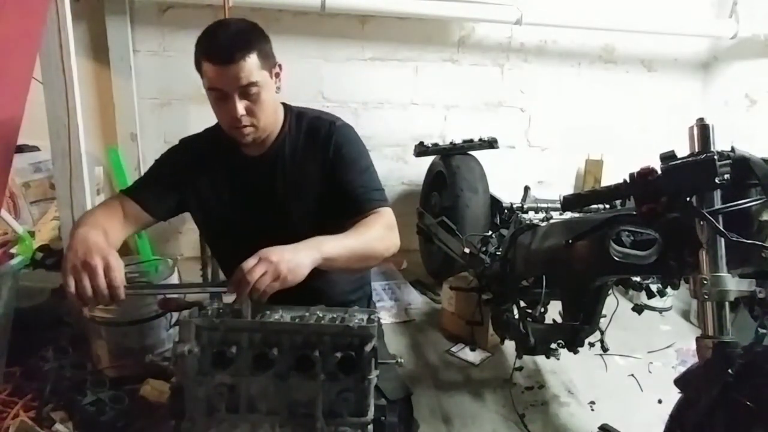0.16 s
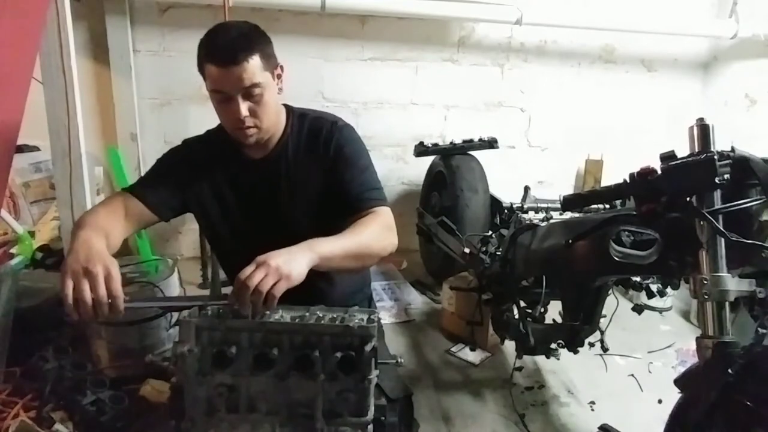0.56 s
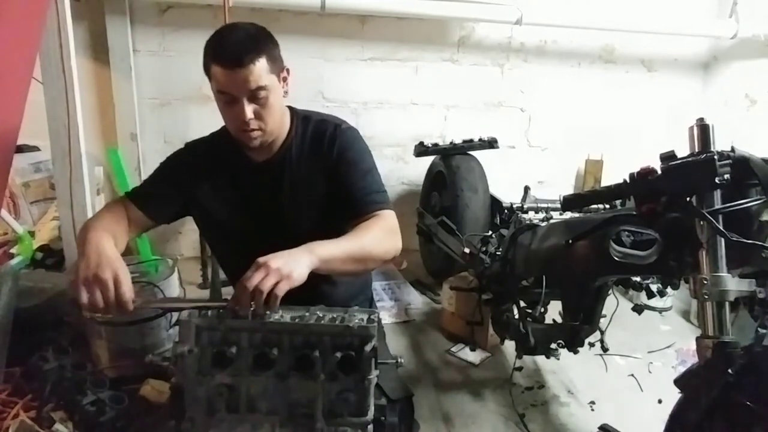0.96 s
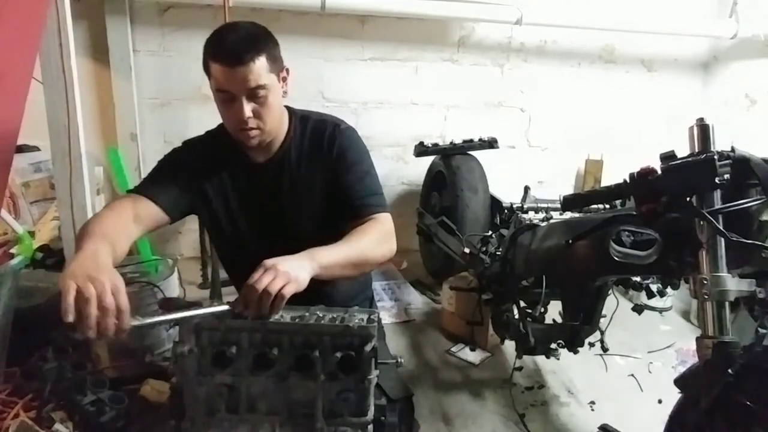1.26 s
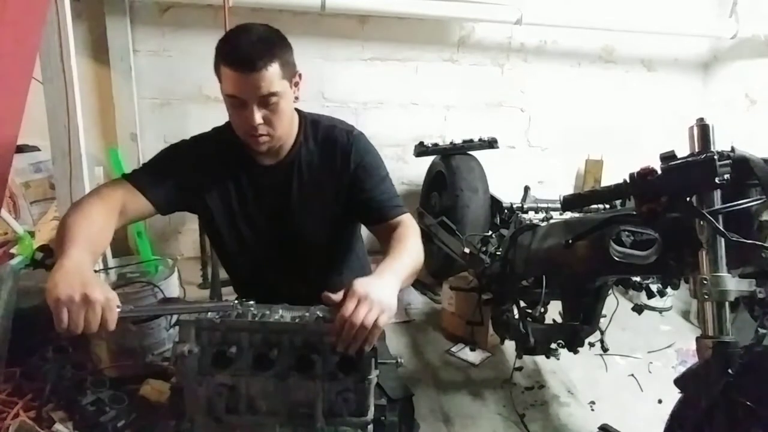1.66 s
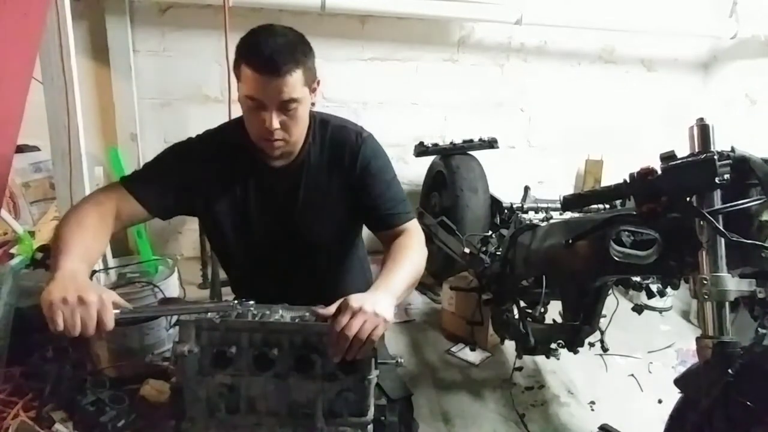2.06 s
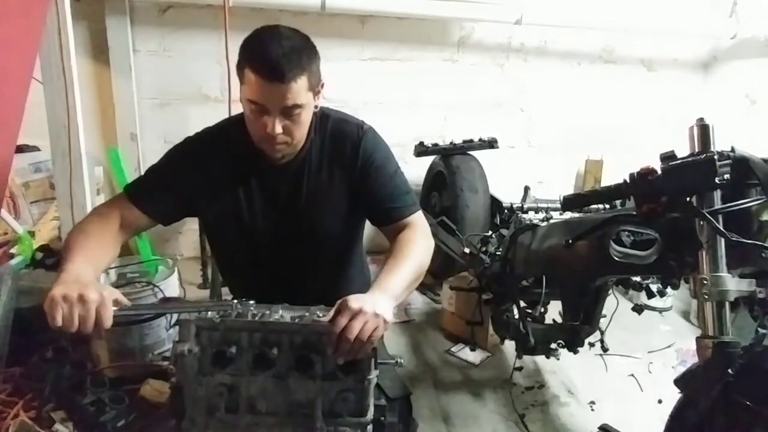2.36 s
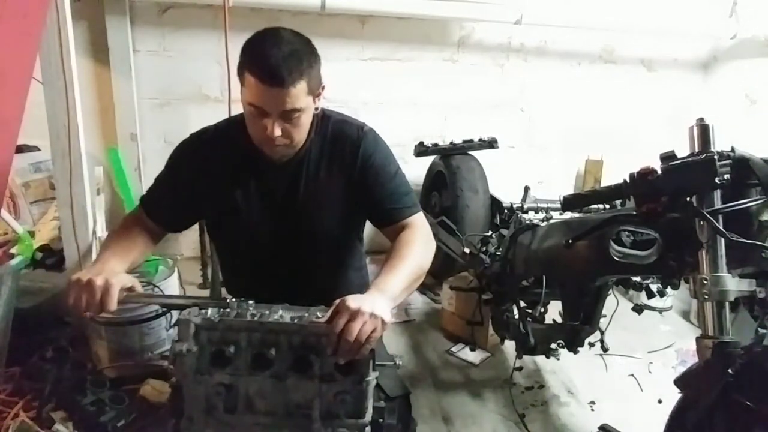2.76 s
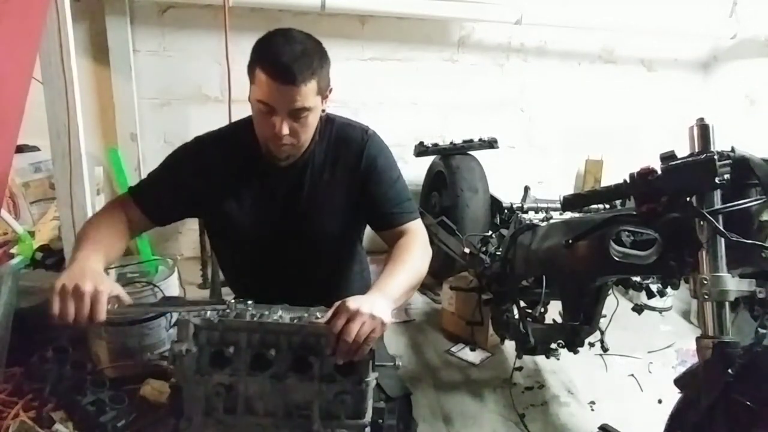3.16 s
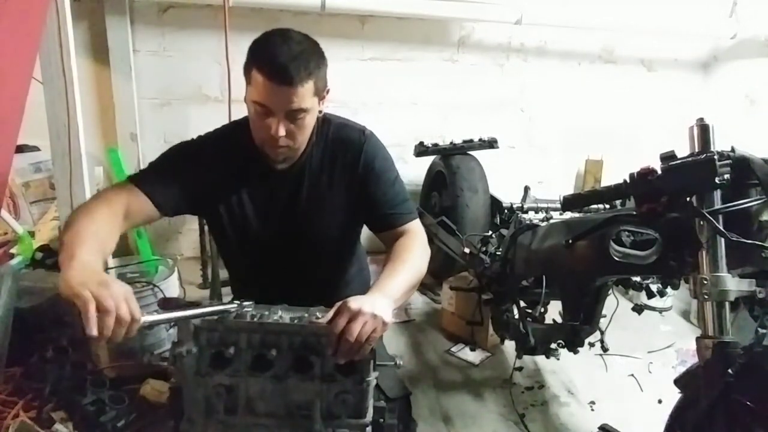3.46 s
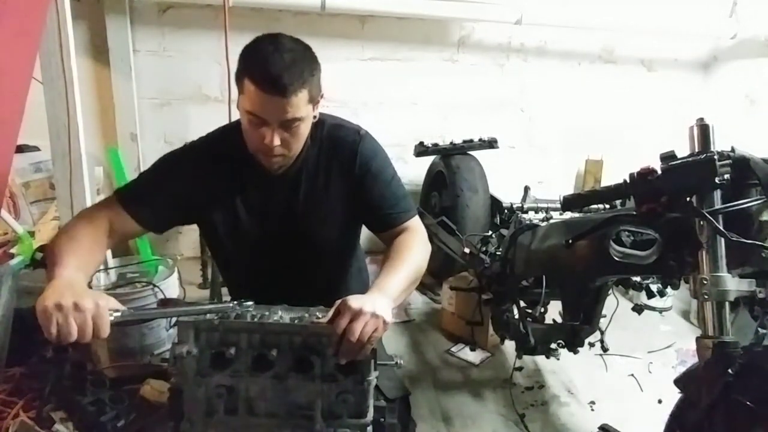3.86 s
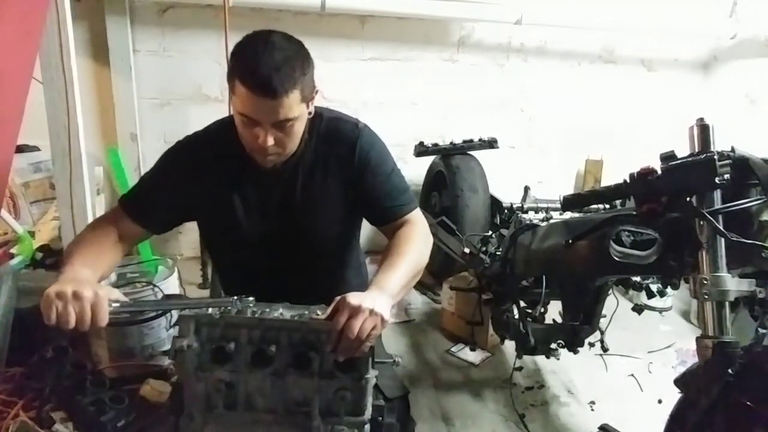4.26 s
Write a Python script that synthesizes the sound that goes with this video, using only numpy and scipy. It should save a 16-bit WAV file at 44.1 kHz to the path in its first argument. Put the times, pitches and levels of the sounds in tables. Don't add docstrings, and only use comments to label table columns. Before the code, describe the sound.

A click-type torque wrench works on an engine block in a small brick garage. A short steel knock comes first, then one hard, bright crack that rings briefly. Five quick ratchet ticks follow, then a quiet gap, then four more ticks. Faint hand and sleeve rustles fall between, over steady low rumble and mains hum, heard by one small microphone with a bright, slightly boxy tone.

```python
import sys
import numpy as np
from scipy import signal
from scipy.fft import rfft, irfft
from scipy.io import wavfile
from scipy.ndimage import uniform_filter1d

SR = 44100
rng = np.random.default_rng(int(sys.argv[2]) if len(sys.argv) > 2 else 0)


def undo_db(level):
    steps = np.asarray(level, float) / 20
    return 10 ** steps


def transcribe(u):
    v = np.clip(np.atleast_2d(u).T, -1, 1)
    q = np.round(v * 32767).astype(np.int16)
    wavfile.write(sys.argv[1], SR, q)


N = 193599

# start_s, energy_db
BREAK_EVENTS = [(.8207, 18.5)]
# freq_hz, density_db_per_hz
BREAK_COLOUR = [(500, -30), (1000, -18.5), (1400, -17), (2000, -18.5), (2600, -8.5), (2950, -11.5),
                (3500, -11.5), (4150, -13), (4700, -6), (5600, -14), (7100, -9.5), (8700, -10.5),
                (10000, -16), (14500, -20.5)]
# freq_hz, level_db, t60_s
TUBE_MODES = [(2600, -1, 0.087), (2710, 9, 0.13), (3070, -16, .2), (3580, -5, .09), (4590, -17, .2),
              (4980, -21, .2), (5830, -22, .2), (6700, 1, .14), (6440, -8, .2), (6660, -4, .14),
              (7040, -3, .25), (7330, 10, 0.16), (7700, -1, 0.081), (7200, -8, .15), (8550, -12, .25),
              (8060, -3, .2), (8963, -29, .2), (9356, -26, .2), (12540, -28, .18)]
# start_s, energy_db
SLACK_EVENTS = [(0.5148, 0.5)]
# freq_hz, density_db_per_hz
SLACK_COLOUR = [(1000, -28), (2000, -10), (3200, -9), (3800, 0), (4700, 3.5), (5400, 1.5), (7200, -13.5),
                (9000, -16), (12000, -24), (17000, -26)]
# freq_hz, level_db, t60_s
SOCKET_MODES = [(3900, -12, .03), (4590, 7, .02), (5200, -7, .05), (5930, -16, .04), (7100, -12, 0.028),
                (8100, -9, .03)]
# start_s, energy_db, seating_0_to_1 (glancing to firm), edge_db (above 12 kHz)
TICKS = [
    (1.1793, -2.5, 0.8, 4),
    (1.2214, -1, 0.7, 2),
    (1.2641, -1.5, .95, 2),
    (1.3071, 0.5, 0, 7),
    (1.358, -4.5, 0.77, 3),
    (3.3223, -1, 0.1, 1),
    (3.3674, -1, 0.57, 3),
    (3.4144, -1, 0.83, 8),
    (3.4715, -2, 0.8, 9),
]
# freq_hz, density_db_per_hz
TICK_COLOURS = [
    [(1600, -34), (2600, -18.5), (3200, -19), (3520, -8.5), (3900, -30), (5500, -4), (7000, -7.5), (8700, -16), (9400, -10), (10800, -10), (11600, -19), (12400, -4), (13800, -13), (15300, -13.5)],
    [(1700, -21), (2200, -22), (3150, -20), (3700, -24), (4300, -16.5), (4900, -16), (5600, -3.5), (7000, -10.5), (8700, -15), (9400, -7), (10900, -9.5), (11700, -16), (12700, -5.5), (13900, -18)],
]
# freq_hz, level_db, t60_s
PAWL_MODES = [(3210, -13, 0.047), (3560, -12, 0.032), (5450, -7, 0.03), (5870, -5, 0.025),
              (6650, -7, 0.067), (6930, -3, 0.044), (7180, 4, 0.027), (7690, 3.5, 0.03), (8330, 7, 0.019),
              (9500, 11, 0.013), (10100, -4, .014), (11000, -7, 0.036), (12200, -7, .009),
              (12900, -4, .011), (14420, -12, .03), (15200, -56, .03)]
# start_s, peak_db, centre_hz, width_hz, decay_ms
TOUCHES = [(.335, -51, 9000, 6000, 4), (0.39, -42.5, 9200, 5000, 2), (0.81, -35, 5800, 7000, 5.5),
           (1.127, -53, 13500, 3000, 4), (1.166, -41, 8800, 6000, 6), (1.602, -41.5, 7700, 9000, 4.1),
           (1.69, -49, 7950, 4000, 3.6), (3.31, -43, 8000, 2500, 5), (3.655, -39, 2840, 1500, 4.3),
           (3.685, -41, 4270, 1800, 12), (3.69, -50, 11000, 7000, 12), (3.842, -55, 8000, 4000, 4)]
# peak_s, peak_db, swell_db_per_s, fade_db_per_s
SWEEPS = [
    (.1, -60.5, 30, -2),
    (2.05, -55, 22, 45),
    (3.7, -55, 110, 80),
]
# freq_hz, density_db_per_hz
CLOTH_COLOUR = [(1500, -27), (6500, -3.5), (9000, -16), (16000, -18)]
# freq_hz, t60_s
ROOM_DECAY = [(1000, 0.27), (2600, 0.35), (6000, 0.32), (12500, 0.2), (16000, 0.15)]
# freq_hz, density_db_per_hz
AIR_COLOUR = [(25, -46), (44, -12), (60, -7.5), (103, -2), (190, -6.5), (300, -9), (800, -17),
              (1100, -18.5), (1900, -26), (3000, -30), (5000, -33.5), (8500, -42.5), (11000, -43.5),
              (17000, -47)]
# freq_hz, width_hz, level_db
BOOM_MODES = [(59.2, 13.2, 12), (93.7, 45, 5.5), (160, 7.9, 0), (242, 41, 4), (265.6, 4, 9), (292, 13, -7),
              (354.6, 26, 5), (407, 10, 4.5), (425, 21, 4), (526, 7.6, -5), (524.5, 9, 10), (570, 5.9, -3),
              (598, 48, 3.5), (637.6, 16.3, 11), (694, 12, 5.5), (920, 28, 4.5), (1030.4, 32, 8),
              (1090, 79, 4.5)]
# freq_hz, level_db_rms
HUM = [(119.4, -46)]

TRAVEL_S = .0006
SECOND_SWING_S = 3
FIRM_BODY_DB, FIRM_SHEEN_DB = 9, 9
PAWL_BOUNCE_MS = 2.2
AIR_DB = -33.5
MIC_HZ, MIC_WIDTH_HZ, MIC_DB = 7165, 2040, 11
STEADY_EDGE_HZ, ATTACK_EDGE_HZ = 15530, 16700


def evened(x):
    return x / np.sqrt(np.mean(x ** 2) + 1e-20)


def read(points, hz):
    f, value = np.transpose(points)
    return np.interp(np.log(hz + 1), np.log(f + 1), value)


def add(mix, start_s, sound):
    part = mix[round((start_s + TRAVEL_S) * SR):][:len(sound)]
    part += sound[:len(part)]


def coloured(x, gain_db):
    hz = abs(np.fft.fftfreq(4096, 1 / SR))
    log_gain = np.maximum(gain_db(hz), -100) * np.log(10) / 20
    taps = np.fft.ifft(np.exp(np.conj(signal.hilbert(log_gain)))).real[:2048]
    return signal.fftconvolve(x, taps)[:len(x)]


def break_over():
    out = np.zeros(N)
    for start_s, energy_db in BREAK_EVENTS:
        crack = blow(lambda hz: read(BREAK_COLOUR, hz), TUBE_MODES, crack_ms=1.3, ring_db=-6.0, spread_db=2,
                     bounce_ms=11.0, bounce_db=-4, wet_db=5.5, linger=0.98, carried_db=-15.5)
        add(out, start_s, undo_db(energy_db) * crack)
    return out


def ratchet():
    out = np.zeros(N)
    for start_s, energy_db, seating, edge_db in TICKS:
        colour = TICK_COLOURS[int(start_s > SECOND_SWING_S)]
        tick = blow(lambda hz: read(colour, hz), PAWL_MODES, crack_ms=1.9, ring_db=-4.5, spread_db=3.5,
                    bounce_ms=PAWL_BOUNCE_MS, bounce_db=-7, wet_db=-1.0, linger=0.98, carried_db=-7.5)
        body_db = FIRM_BODY_DB * seating
        sheen_db = FIRM_SHEEN_DB * seating ** 2
        landing = [(4500, body_db), (5200, 0), (8500, 0), (9000, sheen_db), (11300, sheen_db), (11800, edge_db)]
        add(out, start_s, undo_db(energy_db) * coloured(tick, lambda hz: read(landing, hz)))
    return out


def slack():
    out = np.zeros(N)
    for start_s, energy_db in SLACK_EVENTS:
        knock = blow(lambda hz: read(SLACK_COLOUR, hz), SOCKET_MODES, crack_ms=.8, ring_db=2.0, spread_db=0.0,
                     bounce_ms=3.4, bounce_db=-13, wet_db=1, linger=0.89, carried_db=-13)
        add(out, start_s, undo_db(energy_db) * knock)
    return out


def blow(colour_db, modes, crack_ms, ring_db, spread_db, bounce_ms, bounce_db, wet_db, linger, carried_db):
    t = np.arange(SR // 2) / SR
    chatter = rng.standard_normal(len(t)) * np.exp(-1000 * t / crack_ms)
    chance_db = 10 * np.log10(uniform_filter1d(abs(rfft(chatter, 4096)) ** 2, 50))
    chance_hz = np.fft.rfftfreq(4096, 1 / SR)
    crack = coloured(chatter, lambda hz: colour_db(hz) - np.interp(hz, chance_hz, chance_db))

    mode_hz, mode_db, t60_s = np.transpose(modes)[:, :, None]
    luck = rng.standard_normal((len(modes), 2))
    level = undo_db(mode_db + spread_db * luck[:, :1] - 60 * t / t60_s)
    detuned_hz = mode_hz * (1 + 0.0035 * luck[:, 1:])
    rings = (level * np.sin(2 * np.pi * detuned_hz * t)).sum(0)
    rings /= np.linalg.norm(rings)

    once = crack / np.linalg.norm(crack) + undo_db(ring_db) * rings
    both = once + undo_db(bounce_db) * np.roll(once, round(abs(bounce_ms) * SR / 1000))
    wet = room(colour_db, linger, undo_db(carried_db) * rings)
    whole = both / np.linalg.norm(both) + undo_db(wet_db) * wet
    return whole / np.linalg.norm(whole)


def touches():
    out = np.zeros(N)
    t = np.arange(SR // 2) / SR
    for start_s, peak_db, centre_hz, width_hz, decay_ms in TOUCHES:
        band_db = lambda hz: -20 * np.log10(1 + (2 * (hz - centre_hz) / width_hz) ** 2)
        puff = coloured(rng.standard_normal(len(t)) * np.exp(-1000 * t / decay_ms), band_db)
        puff /= abs(puff).max()
        wet = undo_db(8.5) * np.linalg.norm(puff) * room(band_db, 0.87)
        add(out, start_s, undo_db(peak_db) * (puff + wet))
    return out


def sleeve():
    t = np.arange(N) / SR
    level = np.zeros(N)
    for peak_s, peak_db, swell, fade in SWEEPS:
        before_s, after_s = np.maximum(peak_s - t, 0), np.maximum(t - peak_s, 0)
        level += undo_db(peak_db - abs(swell) * before_s - abs(fade) * after_s)
    return level * evened(coloured(rng.standard_normal(N), lambda hz: read(CLOTH_COLOUR, hz)))


def room(colour_db, linger, rings=(0.,)):
    taps = np.zeros(SR // 2)
    at = np.arange(120, len(taps) - 8, 8)
    taps[at + rng.integers(0, 8, len(at))] = rng.choice([-1., 1.], len(at))
    hz, t, z = signal.stft(taps, SR, nperseg=128)
    t60_s = np.clip(linger * read(ROOM_DECAY, hz), .05, 2)[:, None]
    tail = signal.istft(z * undo_db(-60 * t / t60_s), SR, nperseg=128)[1]
    pulse = coloured(signal.unit_impulse(len(taps)), colour_db)
    tail = signal.fftconvolve(tail, pulse / np.linalg.norm(pulse) + rings)[:len(taps)]
    return tail / np.linalg.norm(tail)


def air():
    hz, t = np.fft.rfftfreq(N + 1, 1 / SR), np.arange(N) / SR
    boom_db = sum(db * np.exp(-(2 * (hz - f) / width) ** 2) for f, width, db in BOOM_MODES)
    spectrum = rfft(rng.standard_normal(N + 1)) * undo_db(read(AIR_COLOUR, hz) + boom_db)
    noise = irfft(spectrum, N + 1)[:N]
    drift = signal.lfilter([1], [1, -np.exp(-2 * np.pi * 3 / SR)], rng.standard_normal(N))
    waver = 1 + 0.91 * evened(drift)
    hum = sum(undo_db(db) * np.sqrt(2) * np.sin(2 * np.pi * f * t) for f, db in HUM)
    return undo_db(AIR_DB) * evened(noise) + waver * hum


def scene():
    return (break_over() + ratchet() + slack() + touches() + sleeve() + air())[None]


def band_limit(x):
    return signal.sosfilt(signal.butter(12, 16780, fs=SR, output="sos"), x)


def record(dry):
    heard = coloured(dry[0], lambda hz: MIC_DB * np.exp(-(2 * (hz - MIC_HZ) / MIC_WIDTH_HZ) ** 2))
    heard = .9 * np.tanh(heard / .9)

    def below(edge_hz):
        return signal.oaconvolve(heard, signal.firwin(1023, edge_hz, window=("kaiser", 9), fs=SR), "same")

    low = below(STEADY_EDGE_HZ)
    top = below(ATTACK_EDGE_HZ) - low
    power = uniform_filter1d(top ** 2, 130)
    attack = power > 8 * np.roll(uniform_filter1d(power, 600), 500)
    opened = undo_db(-26) * top * uniform_filter1d(1. * attack, 100)
    return band_limit((low + opened)[None])


dry = scene()
out = record(dry)
transcribe(out)
```